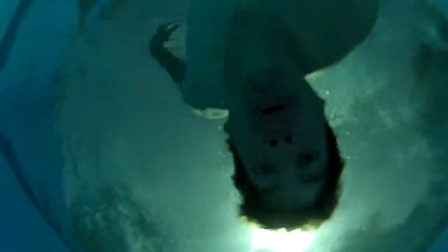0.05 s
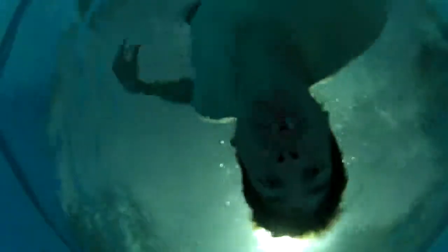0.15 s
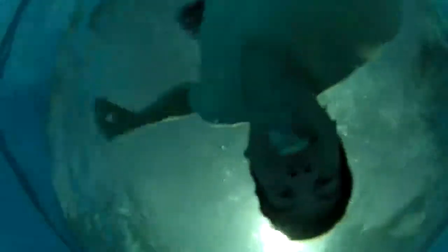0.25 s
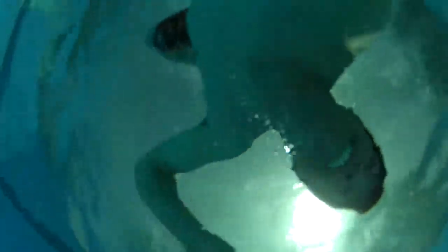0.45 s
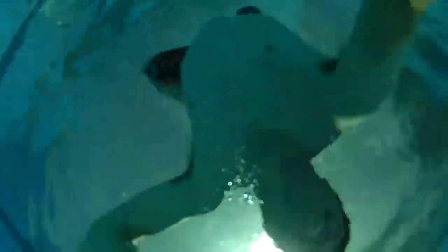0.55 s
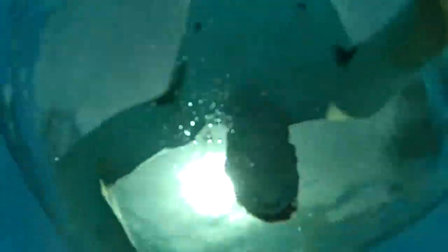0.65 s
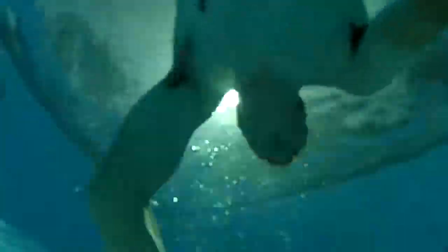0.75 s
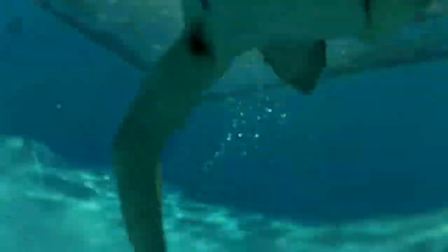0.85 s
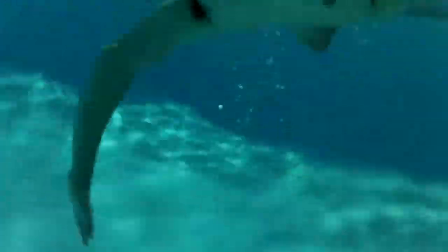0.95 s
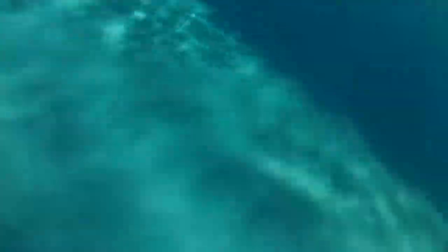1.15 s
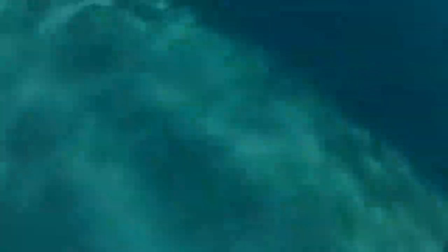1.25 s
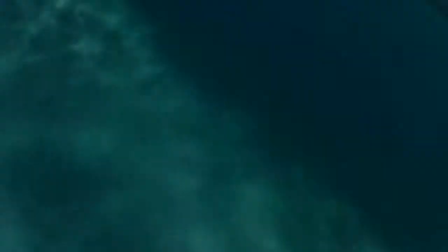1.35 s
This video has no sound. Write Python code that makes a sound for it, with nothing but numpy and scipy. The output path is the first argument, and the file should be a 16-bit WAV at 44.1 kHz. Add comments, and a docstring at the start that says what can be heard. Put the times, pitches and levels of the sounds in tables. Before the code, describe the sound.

Underwater bubbles gurgle close to the microphone in a pool. A loud bloop opens a quick run of gurgles and hollow knocks, then small bubbles pop, tick and fizz away over the low churn of a swimmer's stroke.

```python
"""First comes a faint pump hum with a few tiny pops, then one large bubble bloops loudly.
The listener is a camera under water in a pool, close to a thrashing swimmer.
Air pockets gurgle and knock against the camera's housing, then small bubbles pop, tick and
fizz away over the churn of a stroke. Each bubble rings because the air inside it pulses.
The loudest knocks overload the camera, and the sound has a thin metallic sheen."""
import sys
import numpy as np
from scipy import signal
from scipy.fft import rfft, irfft, next_fast_len
from scipy.io import wavfile

SR = 44100
rng = np.random.default_rng(int(sys.argv[2]) if len(sys.argv) > 2 else 0)


def bounce(signal):
    """Save signal as a 16-bit WAV file at the path given by the first command-line argument."""
    frames = np.transpose(np.atleast_2d(signal))
    limited = np.clip(frames, -1, 1)
    pcm = np.round(limited * 32767).astype(np.int16)
    wavfile.write(sys.argv[1], SR, pcm)


N = 61739
TIME = np.arange(N) / SR


def from_db(db):
    """Turn decibels into a number to multiply by."""
    return 10 ** (np.asarray(db) / 20)


def rms_one(x):
    """Scale a signal so that its average power is 1."""
    return x / np.sqrt(np.mean(x ** 2) + 1e-20)


def level(curve):
    """Join (seconds, dB) points into a volume that changes over time."""
    return from_db(np.interp(TIME, *np.transpose(curve)))


def coloured(x, colour):
    """Make some pitches stronger and others weaker, following (Hz, dB) points."""
    hz, db = np.transpose(colour)
    size = 2 * next_fast_len(N)
    bin_hz = np.arange(size // 2 + 1) * SR / size
    gain = rms_one(from_db(np.interp(np.log(bin_hz + 1), np.log(hz), db)))
    # Make the filter ring only after a sound, never before it.
    cepstrum = irfft(np.log(gain))
    cepstrum[1:size // 2] *= 2
    cepstrum[size // 2 + 1:] = 0
    return irfft(rfft(x, size) * np.exp(rfft(cepstrum)))[:N]


def envelope(start, swell, fade, hold=0):
    """Swell, hold, then die away. A fade time is always the seconds taken to drop 60 dB."""
    age = np.maximum(TIME - start, 0)
    rising = np.sin(np.pi / 2 * np.minimum(age / swell, 1))
    return rising * from_db(-60 * np.clip((age - swell - hold) / fade, 0, 3))


def bubble(start, hz, swell, fade, rise_per_s=0):
    """A pulsing pocket of air: a dying tone that may rise in pitch."""
    age = np.maximum(TIME - start, 0)
    return envelope(start, swell, fade) * np.sin(2 * np.pi * hz * age * (1 + rise_per_s * age / 2))


def click(start):
    """A push that lasts one sample."""
    return signal.unit_impulse(N, int(start * SR))


def ring(clicks, hz, fade):
    """Each click starts a dying tone as strong as itself."""
    decay = from_db(-60 / (fade * SR))
    step = 2 * np.pi * hz / SR
    return signal.lfilter([0, np.sin(step)], [1, -2 * decay * np.cos(step), decay ** 2], clicks + 1e-18)


# The pump fading as the camera turns away. Each row: time in seconds, level in dB.
PUMP_LEVEL = [(.2, -47.5), (1.2, -57)]
# The tone of its rushing noise. Each row: frequency in Hz, relative level in dB.
RUSH_COLOUR = [(60, -15), (125, 2.5), (200, 4.5), (380, 10), (480, 15.5), (620, -28.5), (1400, -16.5),
               (2200, -5), (3700, -37), (5500, -48), (9000, -47), (15000, -37.5)]


def pump(hum_hz=120, rush_db=-4):
    """The pool's pump makes a low hum and a soft rush."""
    hum = np.sin(2 * np.pi * hum_hz * TIME)
    rush = from_db(rush_db) * coloured(rng.standard_normal(N), RUSH_COLOUR)
    return level(PUMP_LEVEL) * (hum + rush)


# The surges of stirred water. Each row: time in seconds, level in dB.
CHURN_LEVEL = [(0, -45), (.2, -67.5), (.26, -30.5), (.33, -28), (.395, -25), (.44, -41), (.55, -40),
               (.597, -18.5), (.635, -43.5), (.76, -41), (.80, -35), (.85, -37.5), (.90, -32), (1.0, -30.5),
               (1.05, -38.5), (1.14, -39.5), (1.21, -53), (1.4, -47)]
# Their deep tone. Each row: frequency in Hz, relative level in dB.
RUMBLE_COLOUR = [(15, 0), (30, 0), (60, 3), (130, -1.5), (200, -4.5), (320, -14.5), (480, -24.5),
                 (700, -22), (1200, -39), (3000, -58)]


def churn():
    """The swimmer's strokes stir the water into a low rumble."""
    return level(CHURN_LEVEL) * coloured(rng.standard_normal(N), RUMBLE_COLOUR)


def cloud(low_hz, high_hz, colour, per_s, cycles, spread_db=4.5):
    """Many bubbles of random strength and pitch, each ringing for some cycles."""
    strengths = from_db(spread_db * np.minimum(rng.exponential(1, N), 4))
    strengths *= rng.choice([-1, 1], N)
    born = rng.random(N) < per_s / SR
    pitches = np.geomspace(low_hz, high_hz, 48)
    chosen = rng.integers(0, len(pitches), N)
    rings = sum(hz * ring(strengths * born * (chosen == k), hz, cycles / hz)
                for k, hz in enumerate(pitches))
    return rms_one(coloured(rings, colour))


# How loud the clouds of small and of finest bubbles are. Each row: time in seconds, level in dB.
SMALL_LEVEL = [(0, -87), (.215, -61), (.228, -37.5), (.28, -51), (.33, -42), (.40, -32.5), (.45, -54),
               (.55, -46), (.6, -37.5), (.655, -59.5), (.73, -40), (.82, -44), (.9, -37.5), (.98, -44),
               (1.02, -44.5), (1.2, -46.5), (1.27, -58.5), (1.4, -53)]
FINEST_LEVEL = [(0, -67.5), (.29, -60.5), (.40, -44.5), (.46, -68.5), (.58, -63), (.66, -62.5), (.72, -43),
                (.745, -35.5), (.768, -48.5), (.825, -41), (.86, -49), (.98, -60), (1.1, -60.5),
                (1.25, -72.5)]
# The tone of each cloud. Each row: frequency in Hz, relative level in dB.
SMALL_COLOUR = [(450, 1), (620, 6), (780, 7.5), (1000, -4), (1300, -1), (2100, 5.5), (2900, -10.5),
                (3700, -5.5), (5000, -25)]
FINEST_COLOUR = [(2500, 12.5), (3700, 9), (5000, -1), (6200, -8.5), (8500, 2.5), (11000, -7.5)]


def fizz():
    """Two clouds ring in the water: small bubbles gurgle softly and the finest ones prickle."""
    small = cloud(513, 3600, SMALL_COLOUR, per_s=1500, cycles=21)
    finest = cloud(2900, 9230, FINEST_COLOUR, per_s=1200, cycles=36)
    return level(SMALL_LEVEL) * small + level(FINEST_LEVEL) * finest


# Sharp ticks on the housing. Each row: start in seconds, relative level in dB.
HOUSING_TICKS = [(0.6072, -33.5), (0.677, -21), (0.693, -16), (0.771, -36), (0.7907, -22), (0.828, -39),
                 (0.8815, -24.5), (0.9118, -21), (0.955, -22), (1.0066, -24.5), (1.0197, -22.5),
                 (1.026, -24.5), (1.05, -29.5), (1.0778, -32), (1.0867, -28), (1.1426, -32), (1.287, -29.5),
                 (1.2925, -40.5), (1.3424, -33.5), (1.3748, -39.5)]
# Their bright tone. Each row: frequency in Hz, relative level in dB.
SNAP_COLOUR = [(500, 0), (1200, 1.5), (2000, 9), (2800, 0), (3700, 7.5), (4600, 2), (5900, -7.5),
               (6900, -1), (8600, -3.5), (11000, -23), (15000, -15)]


def ticks(gain_db=-5, plink_db=-15, swell_s=0.002):
    """Bubbles snap on the housing, each with a burst of noise and a plink of its own pitch."""
    bursts = sum(from_db(db) * envelope(start, swell_s, fade=0.009) for start, db in HOUSING_TICKS)
    sound = bursts * rng.standard_normal(N)
    pitches = rng.uniform(3000, 7500, len(HOUSING_TICKS))
    for (start, db), hz in zip(HOUSING_TICKS, pitches):
        snap = from_db(db) * click(start + swell_s)
        sound += snap + from_db(plink_db) * ring(snap, hz, fade=0.01)
    return from_db(gain_db) * coloured(sound, SNAP_COLOUR)


# Brief ringing tones: small bubbles close by, and the overtones of the first large bloop.
# Each row: start in seconds, pitch in Hz, level in dB, fade in seconds.
BRIEF_TONES = [(0.028, 2860, -50, 0.018), (0.05, 3370, -52, 0.024), (.052, 910, -48.5, 0.058),
               (.122, 2226, -42, 0.027), (0.177, 3120, -40, 0.0088), (.224, 1219, -40.5, 0.21),
               (.226, 2243, -36.5, 0.054), (.231, 1058, -34, 0.15), (.3505, 1840, -24.5, 0.096),
               (.4135, 3165, -21.5, 0.005), (0.4142, 2074, -12.5, 0.006), (.4345, 2500, -24.5, 0.016),
               (.435, 845, -15, 0.038), (.6759, 2003, -6.5, 0.01), (.6762, 1330, -16, 0.02),
               (0.6825, 1970, -17.5, 0.018), (.6885, 3660, -26.5, 0.008), (.6885, 1700, -25.5, 0.0055),
               (.6935, 2094, -15, 0.024), (.7265, 2520, -31.5, 0.024), (.7380, 3800, -24, 0.018),
               (.7460, 3650, -24.5, 0.014), (.7838, 2060, -23, 0.018), (.7898, 5400, -29, .009),
               (.7902, 6630, -29, 0.0063), (.7905, 1950, -22, 0.02), (.7918, 3500, -24, 0.017),
               (.8024, 2232, -7, 0.015), (.8025, 1830, -12.5, .025), (.8025, 1068, -17, 0.02),
               (0.8068, 2410, -16, 0.03), (0.8832, 1810, -27, 0.015), (.9135, 1850, -28, 0.035),
               (.9135, 3620, -23, 0.013), (1.1085, 1677, -28.5, 0.024), (1.1075, 2150, -30, 0.039),
               (1.1805, 2320, -35, 0.06)]


def pops_and_overtones(wobble_depth=0.37, wobble_hz=337):
    """Small pops and the first large bloop's overtones ring, wobbling as the bubbles change shape."""
    smoothing = signal.butter(2, wobble_hz, fs=SR, output="sos")
    strength, phase = wobble_depth * rms_one(signal.sosfilt(smoothing, rng.standard_normal((2, N))))
    wobble = np.sqrt(np.abs(1 + strength)) * np.exp(1j * phase)
    rings = np.zeros(N, complex)
    for start, hz, db, fade in BRIEF_TONES:
        tone = np.exp(2j * np.pi * hz * (TIME - start))
        rings += from_db(db) * envelope(start, swell=0.00019, fade=fade, hold=0.0013) * tone
    return np.imag(rings * wobble)


def tiny_bubbles(start, within_s, count=7):
    """A few bubbles tear off together, at random pitches over three octaves."""
    pitches = 600 * 8 ** ((np.arange(count) + rng.random(count)) / count)
    delays = within_s * rng.random(count)
    return sum((-1) ** k * np.sqrt(hz / pitches.mean()) * ring(click(start + delays[k]), hz, fade=0.02)
               for k, hz in enumerate(pitches))


# The tone of the spray. Each row: frequency in Hz, relative level in dB.
SPRAY_COLOUR = [(300, -0.5), (850, 4.5), (1400, -5), (2000, 2), (2900, -19.5), (3700, -10), (5500, -40),
                (8500, -17.5), (15000, -50)]


def spray(bursts, hiss_db=-6.5, bubbles_db=-14.5, swell_s=0.0025):
    """Each burst of air throws out a short hiss and some tiny bubbles."""
    hiss, bubbles = np.zeros((2, N))
    for start, db in bursts:
        hiss += from_db(db + hiss_db) * envelope(start, swell_s, fade=0.016)
        bubbles += from_db(db + bubbles_db) * tiny_bubbles(start, swell_s)
    return coloured(hiss * rng.standard_normal(N) + bubbles, SPRAY_COLOUR)


# The housing's own notes. Each row: pitch in Hz, relative level in dB, fade in seconds.
HOUSING_NOTES = [(237, -29, 0.041), (464, -1, 0.047), (690, -19.5, 0.025), (817, -13, 0.047),
                 (1142, -19, 0.021), (1850, -15.5, 0.021), (2150, -46.5, 0.025)]


def housing(knocks):
    """A knock makes the camera's case ring at all its notes at once."""
    return sum(from_db(db) * ring(knocks, hz, fade) for hz, db, fade in HOUSING_NOTES)


# Air pockets bursting on the housing.
# Each row: start in seconds, pitch in Hz, then relative levels in dB of thump, knock and spray.
AIR_POCKETS = [(0.2229, 432, -15.5, -20, -33), (0.2893, 218, -16, -30, -39), (0.306, 255, -9, -17.5, -27.5),
               (0.3273, 427, -23, -14, -18.5), (0.34, 162, -9, -20.5, -48), (0.3511, 283, -15, -16, -21.5),
               (0.36, 314, -3, -13.5, -52), (0.3717, 253, -11, -9, -34), (0.386, 840, -35, -13.5, -16.5),
               (.3905, 145, -2.5, -6.5, -38), (0.3921, 374, -0.5, -20, -20), (.4020, 318, -9, -7, -23.5),
               (0.4074, 264, -4.5, -29, -18), (0.4127, 457, -15, -14, -7.5), (0.4363, 594, -5.5, -7, -29),
               (0.4626, 193, -0.5, -11.5, -14.5), (0.4861, 320, 1, -31, -33), (0.4965, 320, -8, -26.5, -53),
               (0.5209, 255, -7, -22, -31), (0.573, 313, -3.5, -18.5, -29), (0.581, 179, -35, -20.5, -32),
               (0.585, 92.3, -10.5, -47, -35), (0.6059, 299, -10.5, -15.5, -13.5)]


def gurgle(swell_cycles=0.54, fade_cycles=3.23):
    """Each air pocket thumps for a few cycles, knocks on the housing and throws a spray."""
    thumps, knocks = np.zeros((2, N))
    bursts = []
    for start, hz, thump_db, knock_db, spray_db in AIR_POCKETS:
        thumps += from_db(thump_db) * bubble(start, hz, swell_cycles / hz, fade_cycles / hz)
        knocks += from_db(knock_db) * click(start)
        bursts.append((start, spray_db))
    return thumps + housing(knocks) + spray(bursts)


# Large bubbles, one much louder than the rest.
# Each row: start in seconds, starting pitch in Hz, level in dB, swell in seconds, fade in seconds.
LARGE_BUBBLES = [(.190, 340, -34.5, 0.0021, 0.047), (0.2215, 433, -7.5, 0.016, 0.12),
                 (0.3277, 464, -16, 0.0017, 0.098), (.3720, 840, -22, 0.007, 0.062),
                 (.3880, 884, -18.5, 0.013, 0.038), (0.4853, 459, -14.5, 0.014, 0.083),
                 (0.5261, 282, -24, 0.0025, 0.072), (.575, 225.4, -13, .003, 0.066),
                 (.621, 550, -31.5, 0.014, 0.049), (0.949, 124.8, -29, 0.041, 0.24),
                 (1.161, 638, -30, 0.0044, 0.14), (1.162, 360, -40, 0.0066, 0.067),
                 (1.165, 232.4, -34.5, 0.0073, 0.13), (1.24, 251, -38, 0.0015, 0.1),
                 (1.247, 455, -42.5, 0.0028, 0.18), (1.260, 655, -33.5, 0.0028, 0.13),
                 (1.311, 671, -32, 0.003, 0.13), (1.357, 703, -34.5, 0.0025, 0.079)]


def bloops():
    """Large bubbles break free and ring, rising in pitch."""
    return sum(from_db(db) * bubble(start, hz, swell, fade, rise_per_s=1.7)
               for start, hz, db, swell, fade in LARGE_BUBBLES)


def scene():
    """Everything reaches one microphone that feeds both channels."""
    sound = pump() + churn() + fizz() + ticks() + pops_and_overtones() + gurgle() + bloops()
    return np.array([sound, sound])


def record(dry, overload=0.64, mirror_hz=12000, sheen_db=2.5, cutoff_hz=15900, right_db=-7.5):
    """The camera clips loud peaks, adds a sheen, cuts the highest treble and is weaker on the right."""
    clipped = np.clip(dry, -overload, overload)
    smoothing = signal.butter(2, 4500, fs=SR, output="sos")
    slope = signal.sosfilt(smoothing, np.diff(clipped, prepend=0))
    # A faint copy of the sound, mirrored around a high frequency, sounds metallic.
    sheen = from_db(sheen_db) * slope * np.cos(2 * np.pi * mirror_hz * TIME)
    treble_cut = signal.cheby2(12, 50, cutoff_hz, fs=SR, output="sos")
    return signal.sosfilt(treble_cut, clipped + sheen) * from_db([[0], [right_db]])


dry = scene()
out = record(dry)
bounce(out)
```